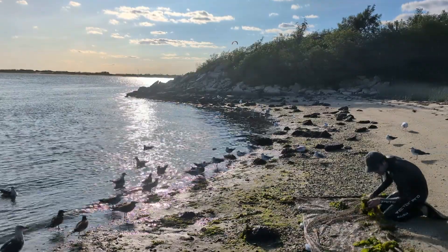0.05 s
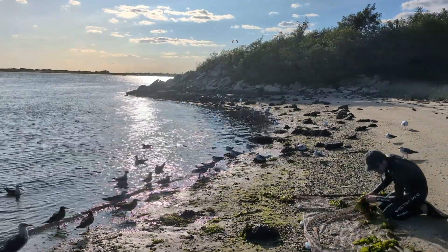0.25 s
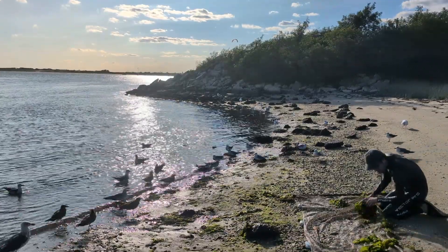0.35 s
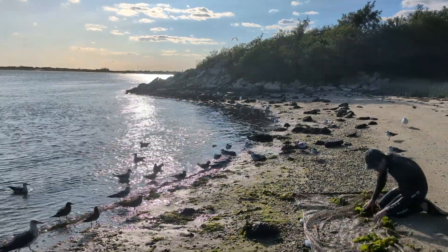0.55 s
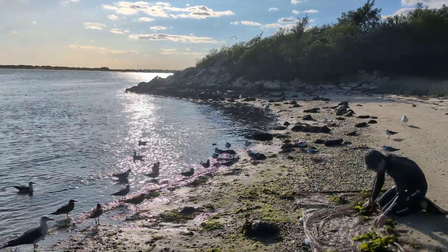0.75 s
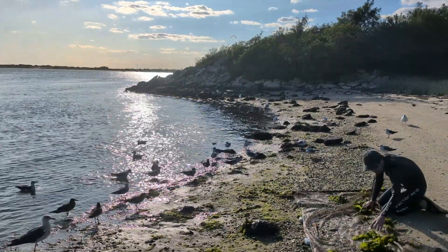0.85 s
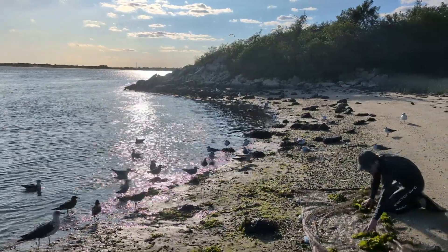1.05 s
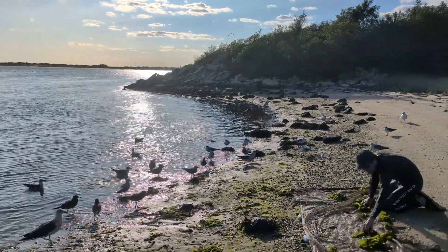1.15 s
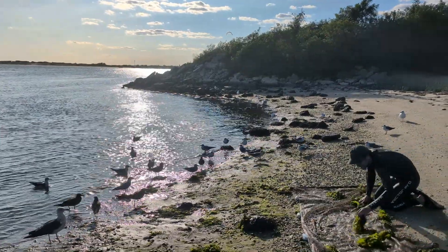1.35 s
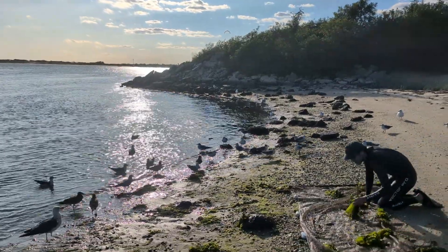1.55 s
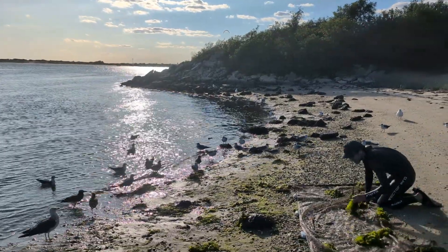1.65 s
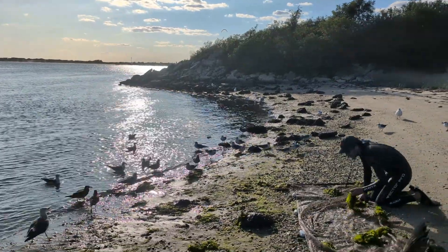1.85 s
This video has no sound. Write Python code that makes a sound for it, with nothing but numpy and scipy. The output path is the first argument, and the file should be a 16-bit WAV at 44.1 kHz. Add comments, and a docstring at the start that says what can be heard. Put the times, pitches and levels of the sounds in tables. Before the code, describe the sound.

Shrill gull cries with creaky onsets, near right, above gentle shore wash and low wind buffets

```python
"""On a shore, close to the right port of a phone, young gulls beg over small waves and buffeting wind.
Whistles are near-pure sines on gliding pitches; one voice jumps between overtones of a low pitch.
Creaks are uneven pulse trains through bill resonances. The left port hears mostly the wash:
flickering noise bands with two sine plops. Wind is low noise in both ports; shells and pebbles tick
as short noise bursts near the right port."""
import sys
import numpy as np
from scipy import signal
from scipy.fft import rfft, irfft
from scipy.io import wavfile
from scipy.ndimage import uniform_filter1d

SR = 44100
rng = np.random.default_rng(int(sys.argv[2]) if len(sys.argv) > 2 else 0)


def transcribe(u):
    """Save the signal u as a 16-bit wav file named by the first command-line argument.

    u: samples, shape (n,) or (channels, n), limited to [-1, 1]; the rate is SR.
    q: integer samples, one column per channel.
    """
    v = np.clip(np.atleast_2d(u).T, -1, 1)
    q = np.round(v * 32767).astype(np.int16)
    wavfile.write(sys.argv[1], SR, q)


def field_ratio(decibels):
    """Amplitude ratio for a level in dB (20 dB per decade); scalars and array-likes work."""
    return 10 ** (np.asarray(decibels, dtype=float) / 20)


N = 83790
T = np.arange(N) / SR  # s

# Wind spectrum, relative density: f/Hz, level/dB per Hz
WIND_SPECTRUM = [(30, -37), (48, -24.5), (70, 1), (170, -3), (390, -31.5)]
# Wind gusts: t/s, level/dB
WIND_GUSTS = [(0, -52), (.52, -53), (.575, -37.5), (.63, -54), (.69, -53.5), (.72, -44), (.84, -54),
              (1.2, -50.5), (1.27, -44), (1.33, -53), (1.9, -55.5)]
# Wash spectrum, relative density: f/Hz, level/dB per Hz
WASH_SPECTRUM = [(390, -26.5), (560, -9), (800, -9), (1050, 1.5), (1300, -8.5), (1700, -18), (2050, -30),
                 (2800, -40.5), (15000, -58)]
# Wash stereo balance: f/Hz, left over right level/dB
WASH_BALANCE = [(700, 3.5), (1300, 15.5), (2000, -19), (15000, -11.5)]
# Wash swell: t/s, level/dB
WASH_SWELL = [(0.0, -50), (1.598, -46.5)]
# Plops in the wash: t/s, level/dB (mean of the two ports), starting f/Hz
PLOPS = [(1.326, -37, 502), (1.375, -29, 937)]
# Louder ticks of wet shells and pebbles: t/s, level/dB before colouring
TICKS = [(1.081, -44), (1.24, -59), (1.405, -57), (1.64, -60)]
# Resonances of the open bill: f/Hz, width/Hz, level/dB before the treble tilt
BILL_RESONANCES = [(3403, 658, 1), (4156, 646, 1), (5200, 820, -3.5), (8030, 1150, -11.5),
                   (13300, 1700, -29)]
# Creaks: start t/s, end t/s, first pulse rate f/Hz, relative level/dB, jitter/0-1, treble tilt/dB per octave
CREAKS = [(0.213, 0.23, 600, -42.5, 0, -3.5), (0.223, 0.243, 650, -37.5, 0.12, 0.5),
          (0.396, 0.426, 469, -36.5, 0.08, -13), (0.407, 0.443, 630, -32.5, .15, -19.5),
          (0.835, 0.855, 497, -47, 0.1, -4.5), (1.314, 1.347, 500, -41.5, 0.1, 5.5)]
# Low pitch of the flipping voice: t/s, f/Hz
FLIP_PITCH = [(0.428, 1182), (0.467, 1103), (0.534, 1181), (0.621, 1159), (0.676, 1106), (0.718, 1140),
              (0.743, 1059), (0.771, 1033), (0.793, 1114), (0.834, 1018), (0.892, 1040)]
# Notes of the flipping voice: start t/s, end t/s, leading harmonic number, relative level/dB
FLIP_NOTES = [(0.437, 0.562, 3, -30), (0.552, 0.672, 4, -37.5), (0.59, 0.637, 3, -44),
              (.681, 0.715, 3, -36.5), (0.72, 0.734, 4, -40), (.748, 0.776, 3, -44),
              (0.757, 0.814, 4, -56.5), (0.822, 0.838, 3, -43.5), (0.837, .852, 2, -47.5),
              (0.85, 0.871, 3, -47.5)]
# Whistles, one list per cry: t/s, pitch f/Hz, relative level/dB
WHISTLES = [
    [(.236, 4340, -45.5), (.25, 4354, -30.5), (.265, 4284, -43.5), (.285, 4225, -50), (.312, 4420, -37),
     (.355, 4570, -39), (.55, 4232, -39), (.61, 4160, -38), (.685, 3904, -45)],
    [(.847, 3994, -38.5), (.873, 4140, -32.5), (.925, 3748, -36), (1., 4034, -36), (1.022, 4176, -48.5)],
    [(.87, 4920, -57.5), (.97, 5236, -60.5), (1.1, 5100, -70)],
    [(1.022, 4710, -61), (1.13, 4730, -62), (1.26, 4450, -62.5)],
    [(1.342, 3186, -50.5), (1.356, 3105, -40), (1.374, 3050, -70)],
    [(1.49, 3790, -66), (1.57, 3960, -44.5), (1.605, 3978, -37.5), (1.68, 3930, -66.5)],
    [(0, 4130, -71), (.115, 3570, -79)],
]
# Octave against the pitch at each cry's loudest point: one level/dB per cry
WHISTLE_OCTAVES = [-16.5, -24.5, -23, -23, -11.5, -13.5, -13]
# Half-pitch stretches: start t/s, end t/s, cry number (rounded), then against the pitch:
# half-pitch level/dB, three-halves level/dB
HALF_PITCHES = [(0.3374, 0.556, 0.5, -22, -19), (0.0034, 0.068, 6, -0.5, -7)]


def walk(rate):
    """Random drift: values held 1 / rate s, slewed twice, spread restored to about 1."""
    hold = int(SR / rate)
    steps = np.repeat(rng.standard_normal(N // hold + 1), hold)
    return 1.725 * uniform_filter1d(uniform_filter1d(steps, hold), hold)[:N]


def curve(rows, col=1):
    """One column of a table drawn as straight lines along time."""
    rows = np.array(rows, float)
    return np.interp(T, rows[:, 0], rows[:, col])


def gate(t0, t1, edge):
    """Smooth fades of edge seconds, centred on t0 and t1."""
    ramp = np.minimum(T - t0, t1 - T) / edge + .5
    return np.sin(np.pi / 2 * np.clip(ramp, 0, 1)) ** 2


def ring(x, hz, width):
    """A resonance with gain 1 at its centre."""
    return signal.lfilter(*signal.iirpeak(hz, hz / width, fs=SR), x)


def phase(rows):
    """Running phase of a pitch table with rounded bends and a slight waver."""
    pitch = uniform_filter1d(curve(rows), int(0.007 * SR))
    waver = 1 + 0.0015 * walk(150)
    return 2 * np.pi * np.cumsum(pitch * waver) / SR


def bands(shape, flicker_db, rate):
    """Third-octave noise pairs (centre Hz, two unrelated signals), each band flickering alone."""
    f = np.fft.rfftfreq(N, 1 / SR) + 1
    pts = np.array(shape, float)
    low, high = pts[0, 0], pts[-1, 0]
    gain = field_ratio(np.interp(np.log(f), np.log(pts[:, 0]), pts[:, 1]))
    gain = gain * (f > low) * (f < 1.05 * high)
    norm = np.sqrt(np.mean(gain ** 2))  # brings the summed bands to about unit power
    for hz in low * 2 ** np.arange(0, np.log2(high / low) + .4, 1 / 3):
        win = np.cos(np.pi / 2 * np.clip(3 * np.log2(f / hz), -1, 1))
        spectrum = rfft(rng.standard_normal((2, N))) * gain * win / norm
        yield hz, irfft(spectrum, N) * field_ratio(flicker_db * walk(rate))


def wind():
    """Low buffeting noise, partly shared by the ports: a common signal plus an opposed one."""
    likeness = .3  # correlation of the ports
    common, opposed = sum(pair for hz, pair in bands(WIND_SPECTRUM, 2.19, 11.72))
    opposed = np.sqrt((1 - likeness) / (1 + likeness)) * opposed
    return np.array([common + opposed, common - opposed]) * field_ratio(curve(WIND_GUSTS))


def wash():
    """Small waves as flickering noise bands, each with its own place between the ports."""
    out = 0
    balance = np.array(WASH_BALANCE, float)
    for hz, pair in bands(WASH_SPECTRUM, 2.55, 12.216):
        pan_db = np.interp(np.log(hz), np.log(balance[:, 0]), balance[:, 1])
        gains = field_ratio(np.array([[pan_db], [-pan_db]]) / 2)
        out = out + 2 * pair * gains / np.sqrt(np.sum(gains ** 2))
    return out * field_ratio(curve(WASH_SWELL))


def plops():
    """Sines that rise in pitch as they die away, stronger at the left port."""
    rise_s, t60_s, glide_per_s = 0.0028, 0.068, 1.27
    out = 0
    for t0, db, hz in PLOPS:
        u = np.maximum(T - t0, 0)
        envelope = (1 - np.exp(-u / rise_s)) * field_ratio(-60 * u / t60_s)
        tone = np.sin(2 * np.pi * hz * u * (1 + glide_per_s * u))
        out = out + field_ratio(db) * np.array([[1.5], [.5]]) * envelope * tone
    return out


def ticks():
    """Wet shells and pebbles: decaying noise clicks, each with its own colour, near the right port."""
    floor_db, decay_s = -71, 0.0014
    out, u = np.zeros(N), np.arange(256) / SR
    # fainter ticks fall by chance, few of them far above the floor
    faint = [(a * T[-len(u)], floor_db - 3 * np.log(b)) for a, b in rng.random((40, 2))]
    for t0, db in TICKS + faint:
        hz = 4500 * 2 ** (1.7 * rng.random())
        click = ring(rng.standard_normal(len(u)) * np.exp(-u / decay_s), hz, hz)
        start = int(t0 * SR)
        out[start:start + len(u)] += field_ratio(db) * click
    return out * np.array([[.06], [1]])


def throat(x, treble_db=0):
    """Resonances of the open bill in alternating polarity, tilted by treble_db per octave."""
    out = 0
    for k, (hz, width, db) in enumerate(BILL_RESONANCES):
        tilt_db = treble_db * np.log2(hz / BILL_RESONANCES[0][0])
        rung = ring(ring(ring(x, hz, width), hz, 2 * width), hz, 2 * width)
        out = out + (-1) ** k * field_ratio(db + tilt_db) * rung
    return out


def creaks():
    """Creaky onsets: uneven pulses that quicken, swell and fade while they ring the throat."""
    rise_hz_per_s = 4500
    out = np.zeros(N)
    for t0, t1, hz0, db, jitter, treble_db in CREAKS:
        t, pulses = t0, np.zeros(N)
        for time_chance, level_chance in rng.standard_normal((80, 2)):
            if t < t1:
                swell = np.sin(np.pi * ((t - t0) / (t1 - t0)) ** 1.17)
                pulses[int(t * SR)] = swell * field_ratio(8.0 * jitter * level_chance)
                t += max(1 + jitter * time_chance, .3) / (hz0 + rise_hz_per_s * (t - t0))
        voice = throat(pulses, treble_db)
        rms = np.sqrt(np.sum(voice ** 2) / SR / (t1 - t0))
        out += field_ratio(db) * voice / rms
    return out


def flipper():
    """A low pitch of which one overtone leads; the lead jumps from note to note."""
    hoarse_db, octave_db, twelfth_db = -37, -55, -67  # relative; the last two are ceilings
    ph = phase(FLIP_PITCH)
    # a noisy puff in each cycle of the low pitch gives a hoarse buzz
    puffs = np.exp(-(ph % (2 * np.pi)) / .3) * (1 + .6 * rng.standard_normal(N))
    buzz_gate = gate(FLIP_NOTES[0][0], FLIP_PITCH[-1][0], 0.012)
    out = field_ratio(hoarse_db + 2.5 * walk(49.14)) * throat(puffs) * buzz_gate
    for t0, t1, lead, db in FLIP_NOTES:
        lead_ph = round(lead) * ph
        octave = field_ratio(min(octave_db, db - 7)) * np.sin(2 * lead_ph)
        twelfth = field_ratio(min(twelfth_db, db - 10)) * np.sin(3 * lead_ph)
        flicker = field_ratio(2 * walk(119.98))
        tone = field_ratio(db) * np.sin(lead_ph) + flicker * (octave + twelfth)
        out = out + tone * gate(t0, t1, .007)
    return np.sqrt(2) * out * field_ratio(.8 * walk(90))


def whistles():
    """Near-pure cries: a sine with its octave, third harmonic and at times a half pitch."""
    third_db = -43.5  # against the pitch
    out = 0
    for k, rows in enumerate(WHISTLES):
        ph = phase(rows)
        tone = np.sin(ph) + field_ratio(third_db) * np.sin(3 * ph)
        for t0, t1, cry, half_db, three_db in HALF_PITCHES:
            if int(round(cry)) == k:
                halves = field_ratio(half_db) * np.sin(ph / 2) + field_ratio(three_db) * np.sin(3 * ph / 2)
                tone = tone + gate(t0, t1, 0.018) * halves
        db = curve(rows, col=2)
        # the octave fades faster than the pitch, and flickers
        octave_db = WHISTLE_OCTAVES[k] + 0.62 * (db - db.max()) + 2 * walk(29.73)
        cry_tone = field_ratio(db) * (tone + field_ratio(octave_db) * np.sin(2 * ph))
        out = out + np.sqrt(2) * cry_tone * gate(rows[0][0], rows[-1][0], 0.0045)
    return out


def gulls():
    """All cries: loud at the right port, dull and faint at the left."""
    left_db, left_cutoff_hz, left_lead_s = -24, 2190, .0006
    cries = 2 * (whistles() + flipper() + creaks())
    low_pass = signal.butter(4, left_cutoff_hz, fs=SR, output="sos")
    left = signal.sosfilt(low_pass, np.roll(cries, -int(left_lead_s * SR)))  # shifted before the low-pass
    return np.array([field_ratio(left_db) * left, cries])


def scene():
    """The gulls over wash, plops, wind and ticks, as left and right ports."""
    return gulls() + wash() + plops() + wind() + ticks()


def roll_off(x):
    """The treble ends steeply here."""
    return signal.sosfilt(signal.butter(12, 15720, fs=SR, output="sos"), x)


def record(dry):
    """The finished mix as the phone stores it."""
    return roll_off(dry)


dry = scene()
out = record(dry)
transcribe(out)
```